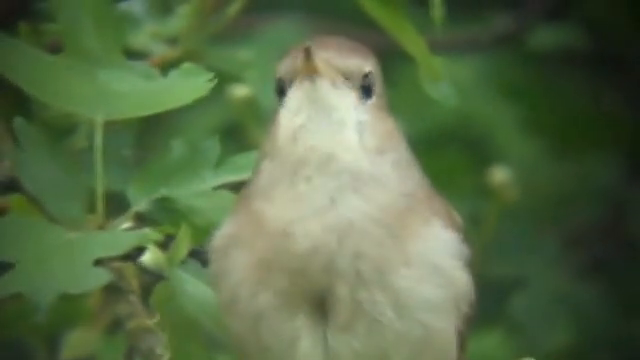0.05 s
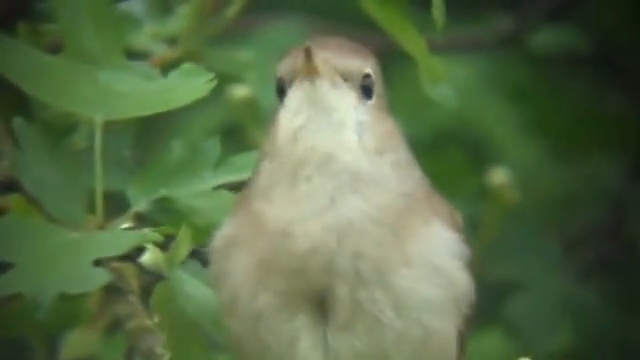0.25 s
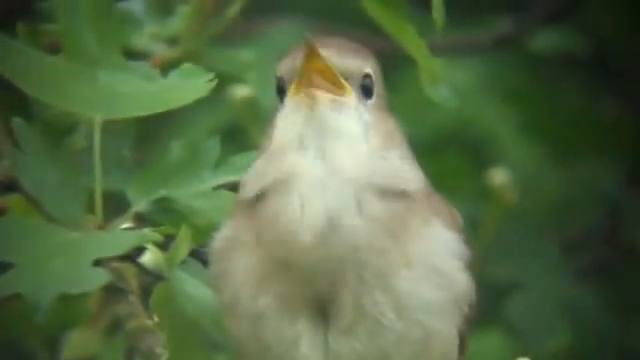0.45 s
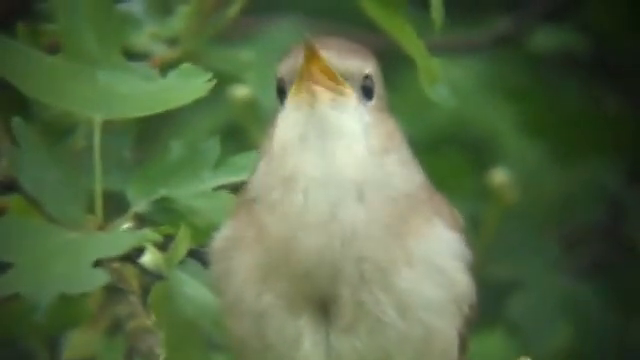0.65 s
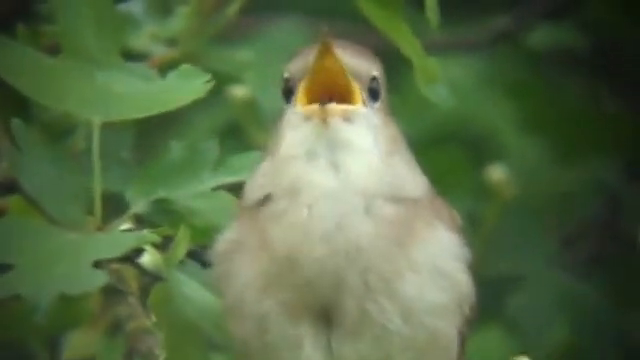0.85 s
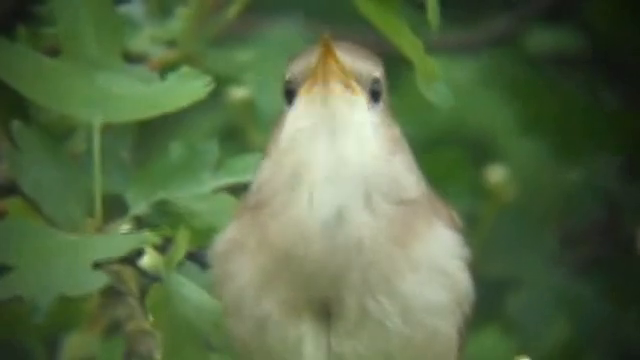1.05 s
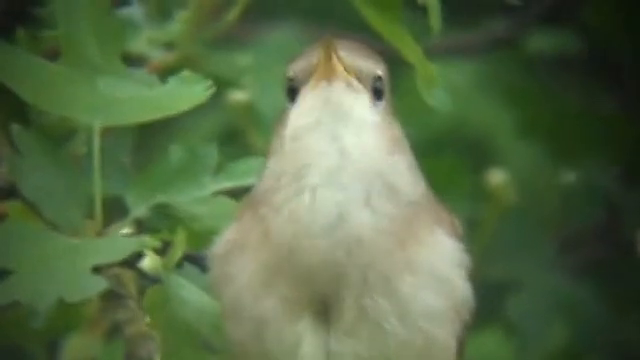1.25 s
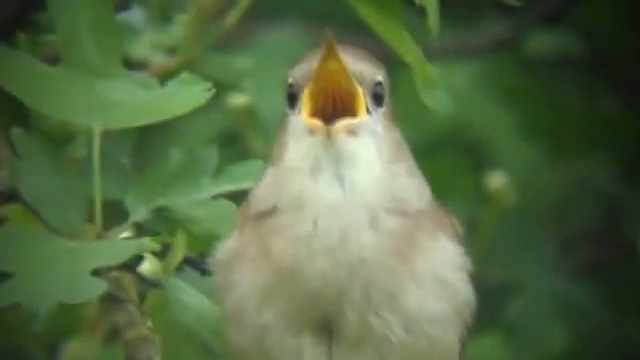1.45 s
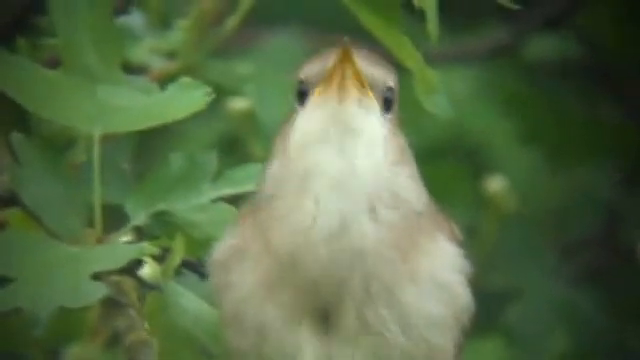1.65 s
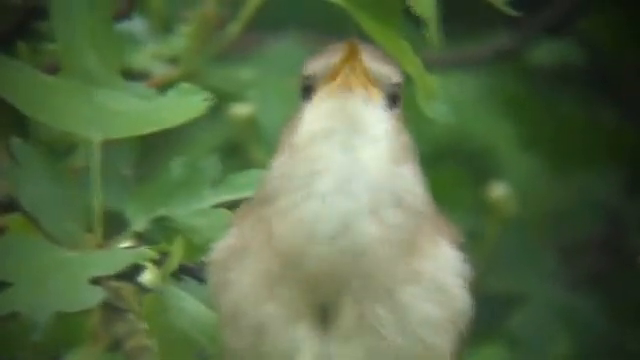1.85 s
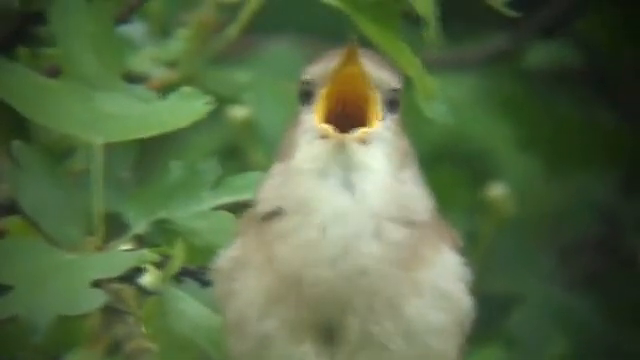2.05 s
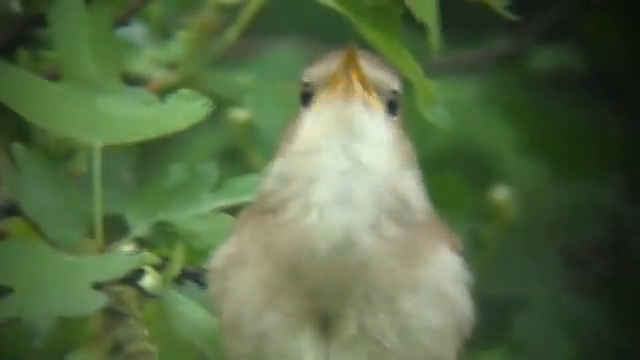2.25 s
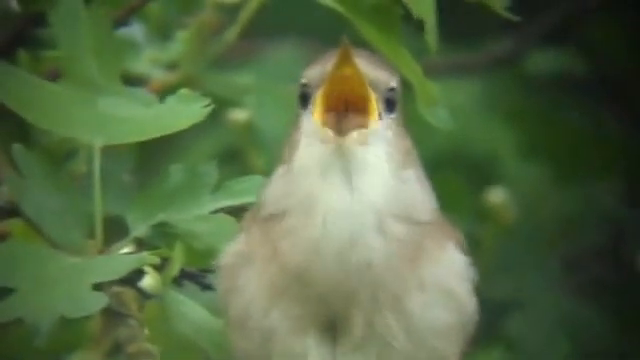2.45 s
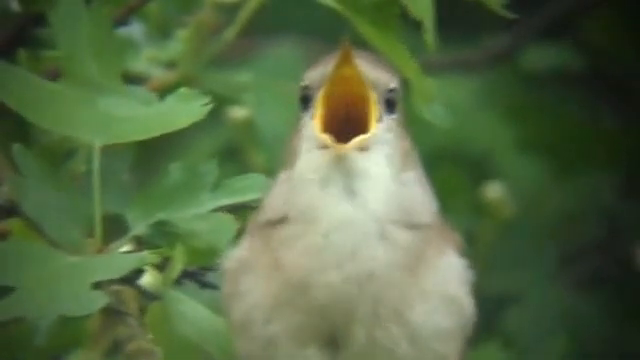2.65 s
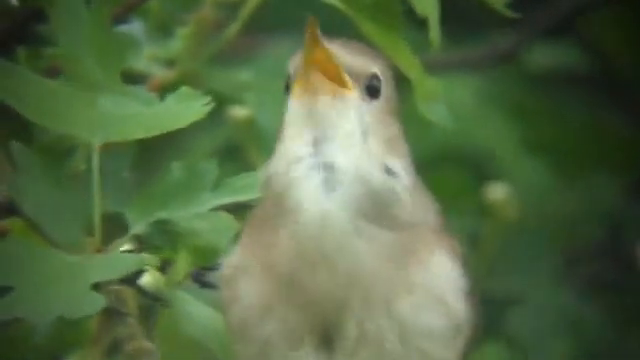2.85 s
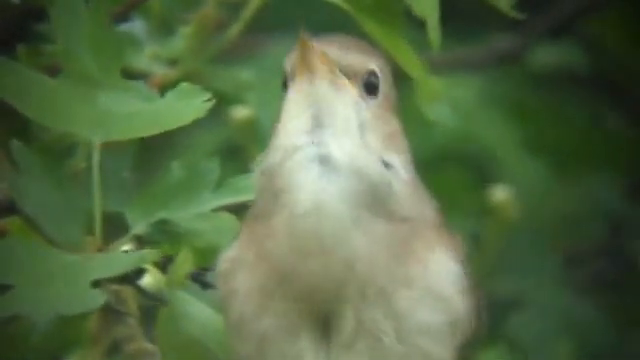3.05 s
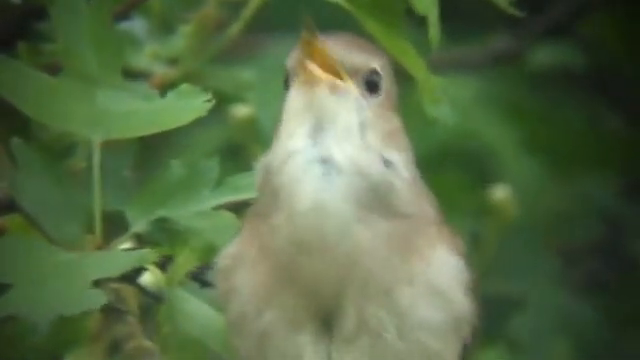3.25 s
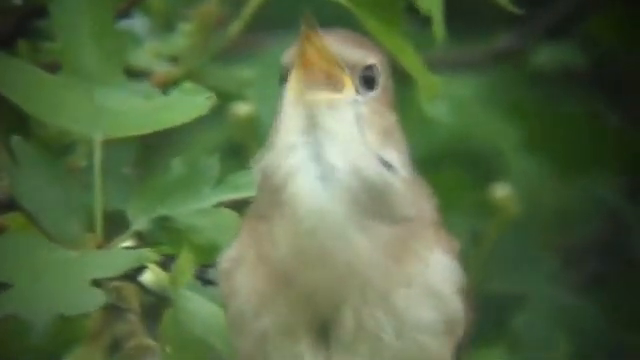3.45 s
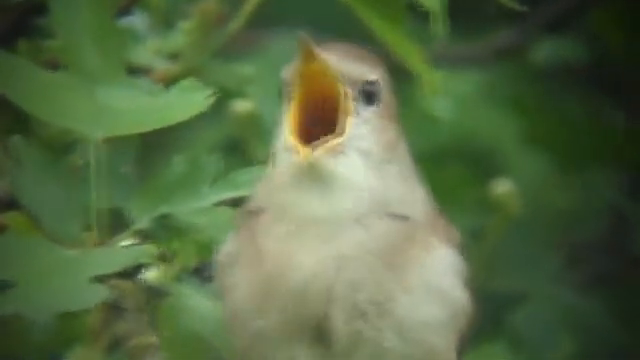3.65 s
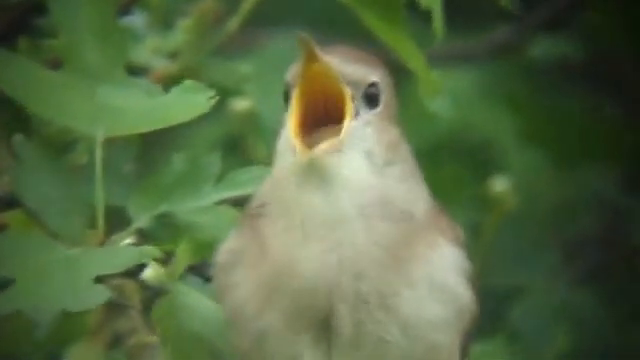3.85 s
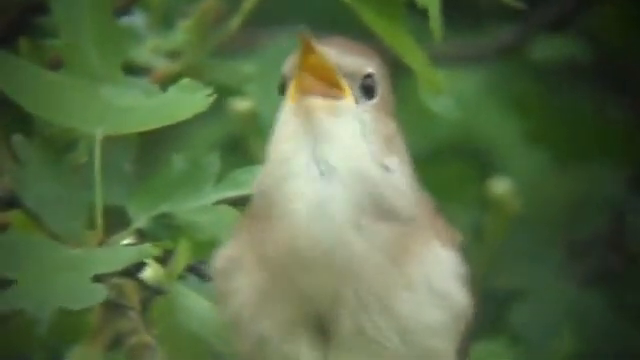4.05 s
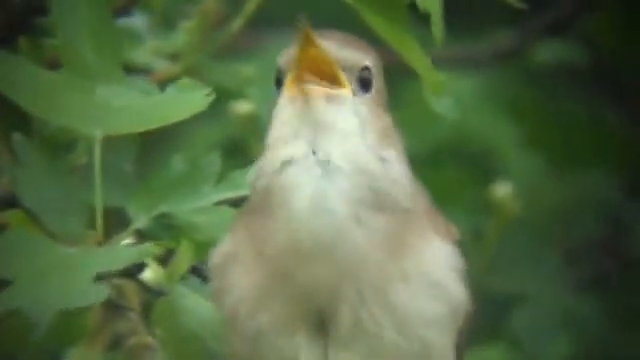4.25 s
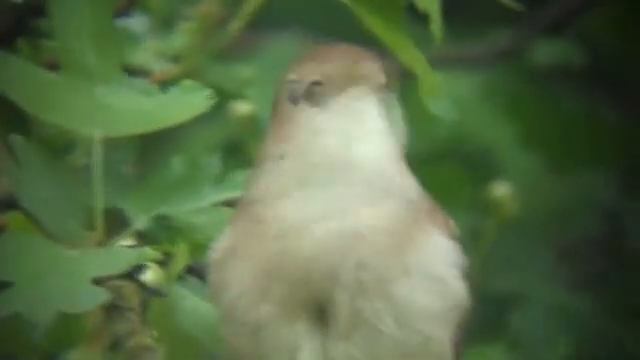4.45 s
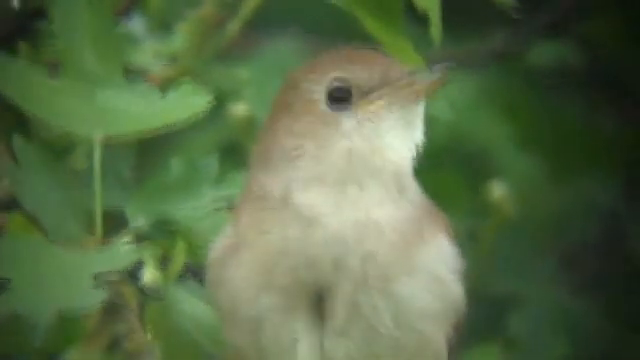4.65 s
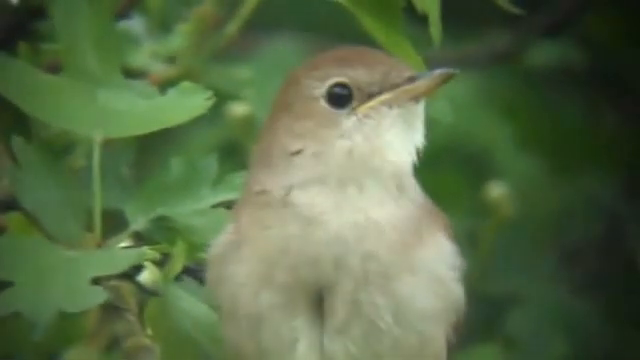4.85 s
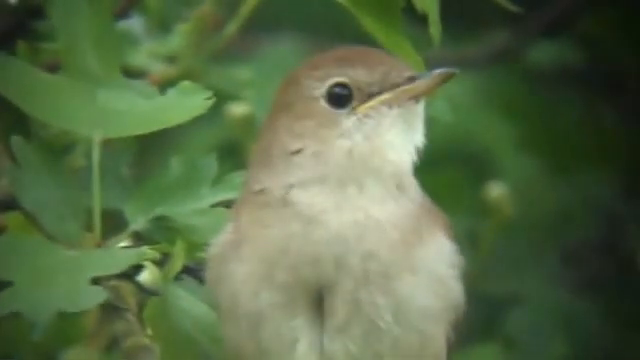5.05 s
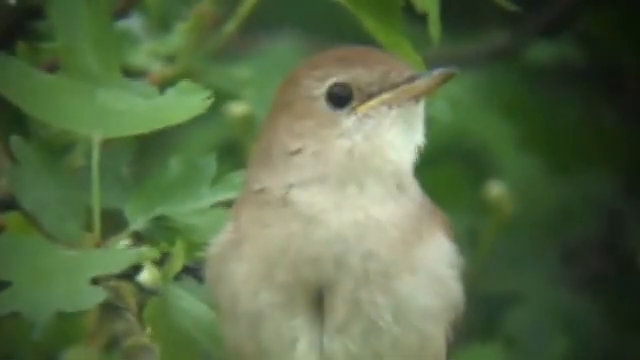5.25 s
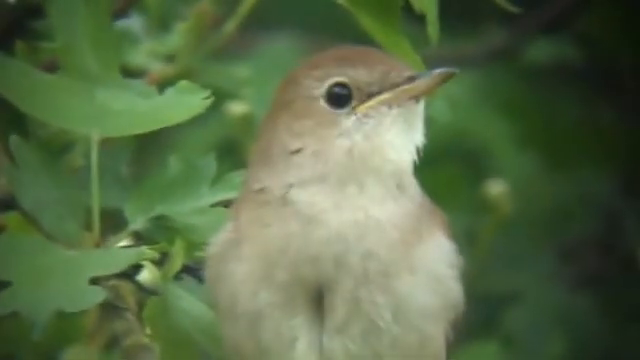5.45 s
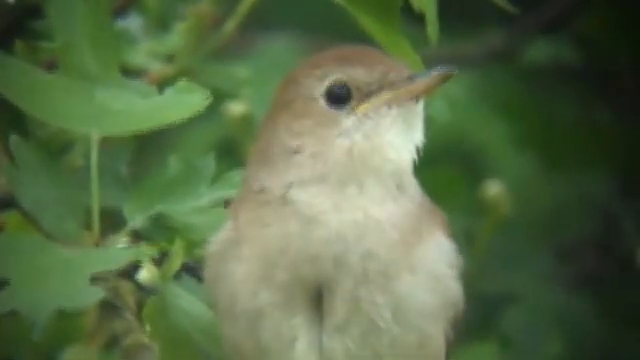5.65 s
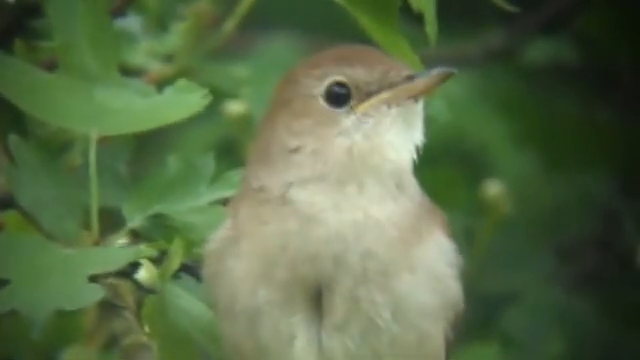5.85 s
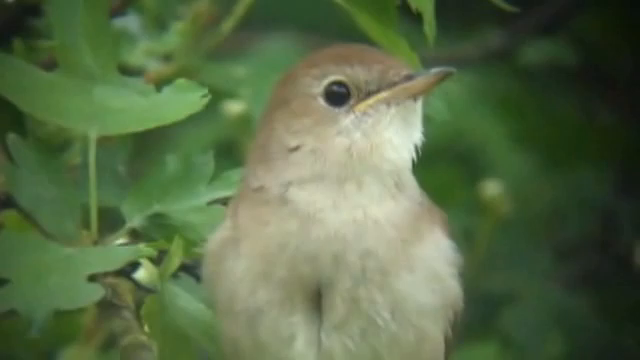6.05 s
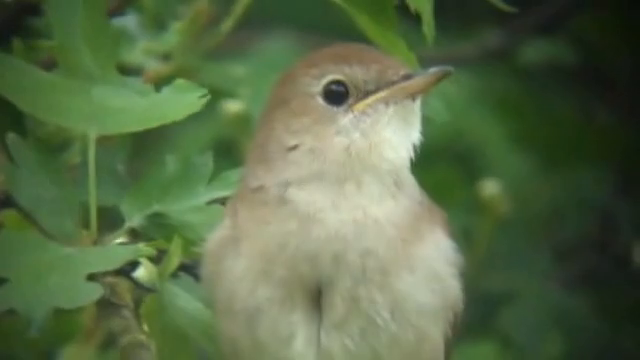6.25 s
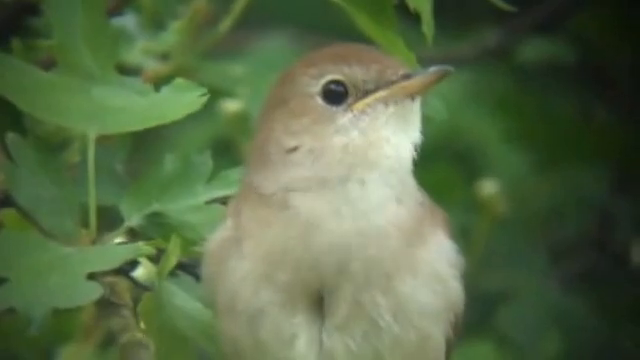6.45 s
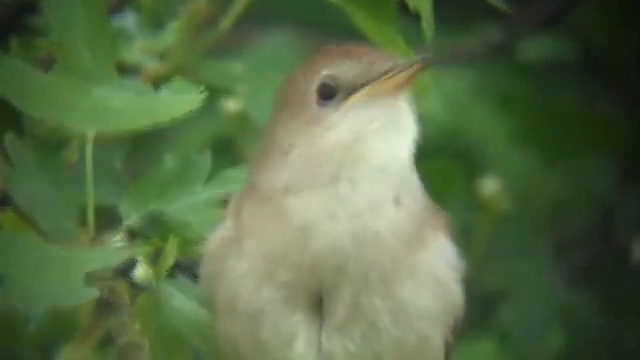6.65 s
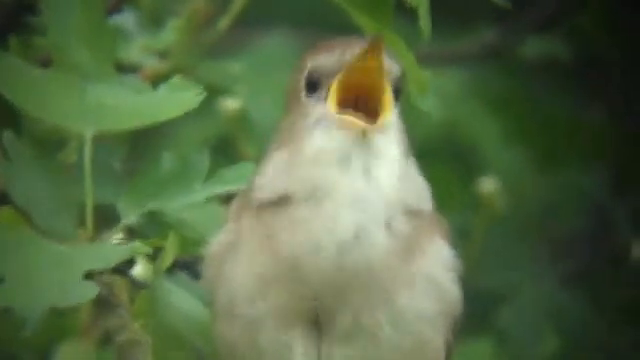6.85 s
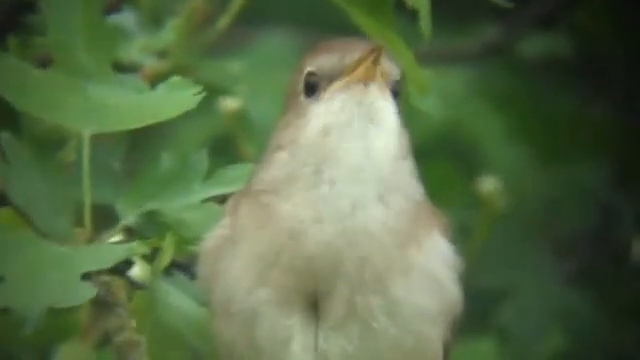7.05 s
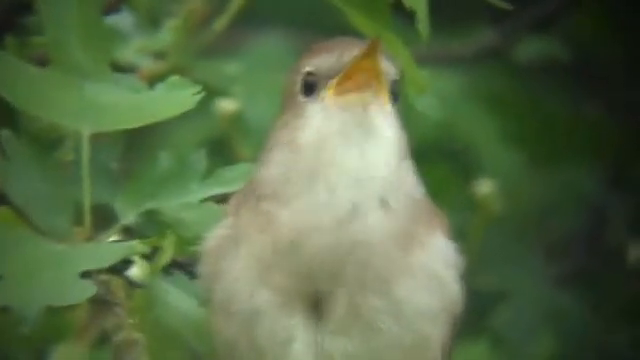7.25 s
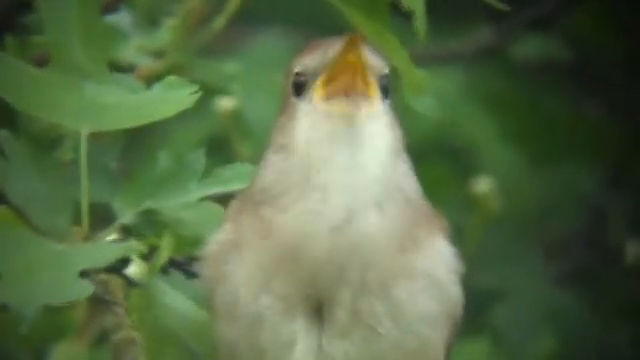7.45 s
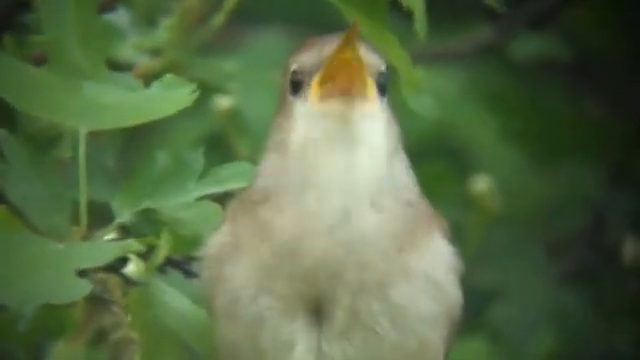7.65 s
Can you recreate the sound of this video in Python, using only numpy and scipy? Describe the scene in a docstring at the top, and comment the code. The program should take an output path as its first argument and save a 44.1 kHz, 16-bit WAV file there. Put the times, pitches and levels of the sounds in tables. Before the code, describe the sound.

Close nightingale song outdoors: whistles, pulsing buzzes, a chugging rattle, bright chips and a dry snap, a pause, then a new phrase.

```python
"""A nightingale sings close by from a hedge: two thin whistles and two buzzes parted by upward flicks, a rattling
run of low notes, two-voiced chips, falling notes and a snap; then a new phrase. Gliding tones with overtones form
most notes, pulsed tones the buzzes, a harmonic stack the mew, noise bursts the snaps. Birds further off are
bending pure tones and pulsed warbles. Branches echo, foliage answers as decaying noise, and shaped stereo noise
makes faint wind rumble and a distant hush."""
import sys
import numpy as np
from scipy import signal
from scipy.fft import rfft, irfft, next_fast_len
from scipy.io import wavfile
from scipy.ndimage import uniform_filter1d, map_coordinates

SR = 44100
rng = np.random.default_rng(int(sys.argv[2]) if len(sys.argv) > 2 else 0)


def int16_out(signal):
    """Quantize to a 16-bit WAV file."""
    q = np.round(np.clip(np.atleast_2d(signal).T, -1, 1) * 32767)
    wavfile.write(sys.argv[1], SR, q.astype(np.int16))


N = 340452
TOP_HZ = 15700


def amp(db):
    """Decibels to gain."""
    return 10 ** (np.asarray(db) / 20)


def unit(x):
    """Scaled to rms 1."""
    return x / np.sqrt(np.mean(x ** 2) + 1e-20)


def along(points, hz):
    """(hz, value) points read on a log frequency axis."""
    f, v = np.transpose(points)
    return np.interp(np.log(np.abs(hz) + 1), np.log(f + 1), v)


def curves(rows):
    """One smoothed curve per column, from the first row's time to the last."""
    s, *columns = np.transpose(rows)
    t = np.arange(s[0], max(s[-1], s[0] + .005), 1 / SR)
    return [uniform_filter1d(np.interp(t, s, c), size=80, mode="nearest") for c in columns]


def wobble(n, rate_hz):
    """A smooth random curve, rate_hz knots a second."""
    knots = rng.standard_normal(int(n * rate_hz / SR) + 4)
    return map_coordinates(knots, [np.arange(n) * rate_hz / SR])


def filtered(x, response):
    """x times a response of frequency."""
    n = x.shape[-1]
    m = next_fast_len(n + 8192)
    return irfft(rfft(x, m) * response(np.fft.rfftfreq(m, 1 / SR)), m)[..., :n]


def add(track, start_s, sound):
    """Mix a sound into a track at start_s."""
    start = max(round(start_s * SR), 0)
    track[start:start + len(sound)] += sound[:max(len(track) - start, 0)]


def soft_ends(n):
    """A gate that opens and closes within about a millisecond."""
    return signal.windows.tukey(n, min(120 / n, 1))


# Left-right likeness of the background: hz, correlation
LIKENESS = [(60, .72), (250, .55), (1000, .72)]


def rush(spectrum, patchy_db):
    """Stereo noise of rms 1 with patches of random gain."""
    z = signal.stft(rng.standard_normal((2, N)), nperseg=512)[2]
    field = uniform_filter1d(rng.standard_normal(z.shape[1:]), size=5, axis=0)
    field = uniform_filter1d(field, size=16, axis=1)
    pair = signal.istft(z * amp(patchy_db * unit(field)), nperseg=512)[1][:, :N]

    def mid_side_response(hz):
        """The less alike the ears are, the more goes to the side."""
        angle = np.arccos(np.clip(along(LIKENESS, hz), -1, 1)) / 2
        return amp(along(spectrum, hz)) * [np.cos(angle), np.sin(angle)]

    mid, side = filtered(pair, mid_side_response)
    return unit(np.array([mid + side, mid - side]))


GUST_RISE_DB_PER_S, GUST_SAG_DB_PER_S = 140, 7.5
GUST_FALL_DB_PER_S = 76  # added to the sag once the gust's length is over


def gust(t, length_s, level_db):
    """Gain of one gust, t seconds after its arrival: it builds, sags and drops."""
    rise_db = GUST_RISE_DB_PER_S * np.minimum(t, 0)
    sag_db = GUST_SAG_DB_PER_S * np.maximum(t, 0)
    fall_db = GUST_FALL_DB_PER_S * np.maximum(t - length_s, 0)
    return amp(level_db + rise_db - sag_db - fall_db)


# Gusts: arrival_s, length_s, level_db
GUSTS = [(0, .3, -23.5), (0.588, .95, -24), (1.693, 2.3, -44), (2.228, 0.15, -35.5), (3.058, 0.14, -35.5)]
# Wind spectrum: hz, relative_db_per_hz
RUMBLE = [(20, -18.5), (70, 0.5), (130, -1), (220, -3.5), (420, -16), (1000, -40), (2000, -87)]
CALM_DB = -51.5


def wind():
    """Low rumbling noise in gusts over a calm floor; powers add."""
    t = np.arange(N) / SR
    power = amp(CALM_DB) ** 2 + sum(gust(t - s, length_s, db) ** 2 for s, length_s, db in GUSTS)
    return np.sqrt(power) * amp(1.2 * wobble(N, 16)) * rush(RUMBLE, patchy_db=1.0)


# Hush level: time_s, level_db
HUSH_LEVEL = [(0, -40.5), (1.8, -37.5), (4.1, -38.5), (6.2, -42)]
# Hush spectrum: hz, relative_db_per_hz
HUSH = [(15, -24), (40, -3.5), (300, -1.5), (650, 1.5), (1080, -2.5), (2400, -17), (4500, -11.5),
        (5900, -14), (7500, -25.5), (13200, -26.5), (14500, -65)]


def hush():
    """The distant hush of the outdoors, slowly varying in level."""
    level_db = np.interp(np.arange(N) / SR, *np.transpose(HUSH_LEVEL))
    return amp(level_db) * rush(HUSH, patchy_db=1.46)


def glide(pitches_hz, n):
    """A smooth pitch curve through evenly spaced pitches."""
    steps = np.linspace(-1, 1, len(pitches_hz))
    polynomial = np.polyfit(steps, pitches_hz, len(pitches_hz) - 1)
    return np.polyval(polynomial, np.linspace(-1, 1, n))


FAR_FADE_DB = 6.5


def arch(length_s, pitches_hz, level_db):
    """Pitch and level of a far note: it bends through its pitches and is weaker at both ends."""
    u = np.linspace(-1, 1, int(length_s * SR))
    hz = glide(pitches_hz, len(u)) * (1 + .011 * wobble(len(u), 70))
    return hz, level_db - FAR_FADE_DB * u ** 4


def far_note(length_s, pitches_hz, level_db):
    """A pure tone that arches through its pitches."""
    hz, db = arch(length_s, pitches_hz, level_db)
    tone = np.sin(2 * np.pi * np.cumsum(hz) / SR)
    return np.sqrt(2) * amp(db) * soft_ends(len(hz)) * tone


TWITTER_COUNT, TWITTER_HZ, TWITTER_S = 50, 4200, .07  # typical pitch and length
TWITTER_DB = -54  # ahead of the trees


def twitter():
    """Faint notes of birds deep in the wood: short bending tones at random times."""
    chorus = np.zeros(N)
    for when, size, height, *bend in rng.uniform(-1, 1, (TWITTER_COUNT, 6)):
        pitches_hz = TWITTER_HZ * np.exp(.4 * height + .08 * np.array(bend))
        note = far_note(TWITTER_S * np.exp(size / 2), pitches_hz, TWITTER_DB)
        add(chorus, (when + 1) / 2 * N / SR, note)
    return chorus


# Small far birds: first_start_s, last_start_s, count, length_s, first_hz, middle_hz, last_hz, level_db
FAR_CALLS = [ (.092, .792, 5, .063, 7500, 6000, 4200, -42), (.32, .32, 1, .1, 3400, 3350, 3330, -37),
             (.516, 1.092, 4, .053, 5450, 5900, 6200, -43), (.98, 1.175, 2, .055, 6700, 5500, 4100, -40),
             (1.42, 1.42, 1, .14, 6800, 6850, 6900, -43), (1.63, 2.127, 3, .038, 5800, 5200, 4200, -39),
             (2.484, 2.65, 3, .034, 5800, 5100, 4200, -44), (2.628, 2.675, 3, .019, 1830, 2070, 1880, -38),
             (3.46, 5.66, 2, .08, 5900, 5750, 5900, -43), (4.558, 5.43, 11, .037, 5850, 4850, 3850, -36.5),
             (5.505, 5.92, 2, .07, 7700, 7600, 7300, -48), (5.79, 5.79, 1, .097, 4000, 3300, 5000, -43),
             (6.24, 6.54, 2, .19, 3650, 3520, 3420, -51), (6.635, 7.615, 2, .085, 6950, 6850, 6800, -42),
             (6.648, 6.648, 1, .02, 2900, 2100, 1500, -42), (6.765, 6.765, 1, .075, 4700, 4540, 4350, -39),
             (7.135, 7.298, 2, .045, 6800, 5300, 4050, -40), (7.325, 7.67, 3, .045, 3600, 4200, 5100, -39)]


def far_calls():
    """Bending tones repeated at even intervals."""
    chorus = np.zeros(N)
    for first_s, last_s, count, length_s, *pitches_hz, db in FAR_CALLS:
        for start_s in np.linspace(first_s, last_s, count):
            add(chorus, start_s, far_note(length_s, pitches_hz, db))
    return chorus


# A larger far bird: start_s, length_s, first_hz, middle_hz, last_hz, level_db
FLUTING = [(1.815, .05, 1950, 2050, 2020, -41), (1.9, .075, 1950, 2020, 1970, -40),
           (2.06, .06, 2150, 2120, 2050, -38), (2.18, .055, 2330, 2470, 2400, -35),
           (2.27, .09, 2550, 2300, 2380, -34), (2.345, .115, 2350, 2480, 1800, -33),
           (2.55, .06, 1950, 2020, 1970, -41), (7.025, .068, 2330, 2470, 2380, -36),
           (7.11, .032, 2330, 2300, 2050, -38), (7.235, .04, 1920, 1900, 1680, -42),
           (7.28, .088, 1980, 1790, 1730, -41), (7.592, .078, 1790, 1760, 1690, -32),
           (7.595, .14, 1980, 2070, 2030, -34)]


def fluting():
    """Low bending pure tones."""
    chorus = np.zeros(N)
    for start_s, length_s, *pitches_hz, db in FLUTING:
        add(chorus, start_s, far_note(length_s, pitches_hz, db))
    return chorus


def ticking(level_db=-47):
    """One far bird's dry ticking: very short falling tones in a quick even row."""
    chorus = np.zeros(N)
    for start_s in np.arange(6, 6.9, .025):
        pitches_hz = np.array([6500, 5000, 4000]) * rng.lognormal(0, 0.13)
        add(chorus, start_s, far_note(0.0068, pitches_hz, rng.normal(level_db, 2.3)))
    return chorus


# Overtone levels before push: hz, level_below_note_db
OVERTONES = [(3500, -14), (6000, -13.5), (8000, -29), (10000, -19.5), (11600, -9), (13300, -7.5),
             (14800, -20)]


def syrinx(hz, db, overtone_db, rasp_rad, even_db=0, waver=0.0066, flutter_db=1.66):
    """An unsteady tone; overtones grow where it is loudest, rasp blurs them, even_db offsets even ones."""
    n = len(hz)
    phase = 2 * np.pi * np.cumsum(hz * (1 + waver * wobble(n, 249))) / SR
    push = amp(overtone_db + .5 * (db - db.max()))
    overtones = np.zeros(n)
    for k in range(2, 8):
        gain = amp(along(OVERTONES, k * hz) + even_db * (k % 2 == 0)) * (k * hz < TOP_HZ)
        overtones += gain * np.sin(k * phase + rasp_rad * wobble(n, 2000))
    level = np.sqrt(2) * amp(db + flutter_db * wobble(n, 83.0)) * soft_ends(n)
    return level * (np.sin(phase) + push * overtones)


def buzz(hz, db, rate_hz, swing, dip_db, overtone_db, unevenness=0.04):
    """A tone chopped into quick uneven pulses, each sliding down in pitch."""
    n = len(hz)
    cycle = 2 * np.pi * np.cumsum(rate_hz * (1 + unevenness * wobble(n, 62.7))) / SR
    gap = ((1 + np.cos(cycle)) / 2) ** 3
    depth_db = dip_db * np.exp(0.35 * wobble(n, 35))
    pulsed_hz = hz * (1 + swing * np.sin(cycle))
    pulsed_db = db + 2 - depth_db * gap
    return syrinx(pulsed_hz, pulsed_db, overtone_db, rasp_rad=0.15, even_db=-8.5, waver=.011, flutter_db=.8)


# Warbles: start_s, length_s, first_hz, middle_hz, last_hz, level_db, first_swings_per_s, last_swings_per_s
FAR_WARBLES = [(0, .175, 4150, 3450, 2150, -36, 230, 170), (.245, .058, 2500, 3400, 4500, -34.5, 240, 170),
               (7.405, .15, 2550, 2120, 2100, -39, 75, 55)]


def far_warbles():
    """Arching tones whose pitch and level swing rapidly."""
    chorus = np.zeros(N)
    for start_s, length_s, *pitches_hz, level_db, first_rate, last_rate in FAR_WARBLES:
        hz, db = arch(length_s, pitches_hz, level_db)
        rate_hz = np.linspace(first_rate, last_rate, len(hz))
        add(chorus, start_s, buzz(hz, db, rate_hz, swing=0.13, dip_db=4.5, overtone_db=-42))
    return chorus


# Foliage decay: hz, t60_s
WOOD = [(4000, 0.42), (12000, 0.29)]


def trees(x):
    """Sound scattered by foliage: decaying noise tails, different at each ear."""
    hz, t, z = signal.stft(rng.standard_normal((2, SR)), SR, nperseg=256)
    decay = amp(-60 * t / along(WOOD, hz)[:, None])
    tail = signal.istft(z * decay, SR, nperseg=256)[1]
    tail /= np.linalg.norm(tail[0])
    delayed = np.pad(x, (400, 0))[None]
    mid, side = signal.fftconvolve(delayed, tail, axes=1)[:, :N]
    return mid + 0.75 * np.array([side, -side])


# Nearby branches: delay_s, level_db
ECHOES = [(.0042, -20), (.014, -18), (0.019, -17)]
# Stereo balance: hz, left_minus_right_db
PAN = [(3600, -3), (5000, 0.5)]


def branches(x):
    """The direct sound and a few early echoes, panned by frequency."""
    near = x.copy()
    for delay_s, db in ECHOES:
        add(near, delay_s, amp(db) * x)
    return filtered(near, lambda hz: amp(np.outer([.5, -.5], along(PAN, hz))))


# Dry noise burst: hz, relative_db_per_hz
SNAP_COLOUR = [(1500, -17), (2900, -10), (4500, 5), (6500, -2.5), (8500, -20), (12700, -2), (15500, -30)]


def snap(level_db, t60_s, hold_s=0.0097):
    """A harsh noise burst that starts at once, holds for a moment and dies quickly."""
    t = np.arange(SR // 8) / SR
    noise = rng.standard_normal(len(t))
    burst = unit(filtered(noise, lambda hz: amp(along(SNAP_COLOUR, hz))))
    return burst * amp(level_db - 60 * np.maximum(t - hold_s, 0) / t60_s) * soft_ends(len(t))


# Nasal note: time_s, pitch_hz, level_db
MEW = [(7.395, 1347, -35.5), (7.412, 1422, -27), (7.429, 1304, -27.5), (7.443, 1060, -31)]
# Throat resonance: hz, level_db
NASAL = [(1400, -13), (2800, -4), (4100, 7.5), (5600, -2.5), (8000, -24)]


def mew():
    """A low stack of harmonics, the third brought out by the throat."""
    hz, db = curves(MEW)
    phase = 2 * np.pi * np.cumsum(hz * (1 + .006 * wobble(len(hz), 400))) / SR
    stack = sum(amp(along(NASAL, k * hz)) * np.sin(k * phase) for k in range(1, 12))
    return amp(db) * soft_ends(len(hz)) * unit(stack)


BUZZ_HZ, BUZZ_HZ_PER_DB, BUZZ_RATE_HZ = 3770, 11, 152  # pitch at full effort, rise with effort, pulse rate
BUZZ_ATTACK_S, BUZZ_RELEASE_S, BUZZ_EDGE_DB = 0.031, 0.0094, 12
BUZZ_GAP_DB, BUZZ_GAP_PER_DB = 14, 1.1  # typical dip at full effort, deepening per dB below it


def crescendo(length_s, final_db, growth_db):
    """A growing buzz; with effort its pitch rises and its separate pulses run together."""
    t = np.arange(int(length_s * SR)) / SR
    attack = np.maximum(1 - t / BUZZ_ATTACK_S, 0)
    release = np.maximum(1 - (length_s - t) / BUZZ_RELEASE_S, 0)
    effort_db = growth_db * (t / length_s - 1)
    hz = BUZZ_HZ + BUZZ_HZ_PER_DB * effort_db
    db = final_db + effort_db - BUZZ_EDGE_DB * (attack + release)
    dip_db = BUZZ_GAP_DB + BUZZ_GAP_PER_DB * (final_db - db)
    return buzz(hz, db, BUZZ_RATE_HZ, swing=.036, dip_db=dip_db, overtone_db=-5)


# Syllables, before each note's level, pitch and length: name -> overtone_db, rasp_rad, strokes
# Strokes: delay_s, length_s, level_db, swell_s, swell_db, pitches_hz (mean, at even steps)
SYLLABLES = { "flick": (-24.5, .5, [(0, .02, -12, 0.016, 6, [2100, 2520, 2750]),
             (.003, .027, -13.5, 0.036, 8.5, [1740, 1860, 2250]),
             (.012, .021, -18, .012, 11, [3500, 3850, 4750]),
             (.027, 0.015, -1, 0.0094, 11.5, [2160, 2700, 2850, 3330])]),
             "chug": (-11.5, .7, [ (0, .019, -3, 0.016, 6, [1970, 1859, 2048, 2310]),
             (.014, .023, -2.5, 0.0076, 4.5, [2210, 2440, 1770, 1290])]),
             "chip": (0, 1.0, [(0, .016, -3.5, .006, 20, [2900, 4750, 5450]),
             (.007, .021, 0, .01, 18, [3500, 4480, 5120])]),
             "seer": (0, .6, [(0, .031, 0, .017, 22, [8600, 7550, 6550, 6300, 5250])]),
             "tew": (-12.5, .8, [(0, 0.023, -8.5, 0.018, 18, [1720, 1890, 2840]),
             (.028, .028, 0.5, 0.011, 4, [4040, 2946, 2590, 2490])]),
             "tsip": (-11, 0.32, [(0.00014, 0.039, -2.5, 0.023, 16, [2600, 4540, 3890, 3150, 3020])]), }
FADE_DB = 19.5  # fall from a stroke's peak to its end
SWELL_POWER = 1.96  # 1 sharp peak, 2 round
PITCH_SCATTER = .02  # random deviation, share of a stroke's pitch span


def syllable(name, level_db, pitch_ratio, stretch=1):
    """Each stroke glides in pitch, swells to its peak and fades; strokes may overlap."""
    overtone_db, rasp_rad, strokes = SYLLABLES[name]
    sound = np.zeros(SR // 8)
    for delay_s, length_s, db, swell_s, swell_db, pitches_hz in strokes:
        t = np.arange(int(length_s * stretch * SR)) / (SR * stretch)
        rising = np.maximum(1 - t / swell_s, 0)
        falling = np.maximum(t - swell_s, 0) / max(length_s - swell_s, 1 / SR)
        shape_db = -swell_db * rising ** SWELL_POWER - FADE_DB * falling ** SWELL_POWER
        scattered_hz = rng.normal(pitches_hz, PITCH_SCATTER * np.ptp(pitches_hz))
        hz = pitch_ratio * glide(scattered_hz, len(t))
        stroke = syrinx(hz, level_db + db + shape_db, overtone_db, rasp_rad, flutter_db=1.5)
        add(sound, delay_s * stretch, stroke)
    return sound


# Flicks, one before each long note: start_s
FLICK_TIMES = [0.739, 1.458, 2.033, 2.585]
FLICK_DB, FLICK_GROWTH_DB, FLICK_PITCH_RATIO = -23, 3, 1.02  # first level, gain of each next one
# Whistles: time_s, pitch_hz, level_db
WHISTLES = [
    [(0.935, 3770, -36.5), (1.125, 3695, -25.5), (1.161, 3786, -21.5), (1.221, 3880, -22),
     (1.291, 3810, -23.5), (1.32, 3430, -34)],
    [(1.635, 3700, -36), (1.662, 3620, -23.5), (1.737, 3797, -19), (1.797, 3800, -18.5), (1.827, 3928, -18),
     (1.887, 3810, -19.5), (1.9, 3670, -33)],
    [(7.098, 3150, -29.5), (7.13, 3215, -18), (7.151, 3317, -16.5), (7.168, 3228, -10), (7.18, 3167, -15),
     (7.187, 3260, -25)],
]
# Buzzes: start_s, length_s, final_level_db, crescendo_db
BUZZES = [(2.186, 0.294, -13, 8.5), (2.741, 0.238, -13.5, 3.5)]
# Quick notes: start_s, syllable, level_db, pitch_ratio, length_ratio
NOTES = [(2.615, "chip", -23.5, .8, 0.44), (3.073, "chug", -15, 0.96, 1.12),
         (3.15, "chug", -13, 1.015, .98), (3.235, "chug", -14.5, 0.96, .95),
         (3.317, "chug", -15, 0.98, 1.03), (3.402, "chug", -15.5, 0.96, 1),
         (3.488, "chug", -15, 0.97, 0.89), (3.574, "chug", -15, 0.95, 0.97),
         (3.576, "chip", -31, .93, 0.99), (3.654, "chug", -16, 0.97, 1.2),
         (3.738, "chug", -14.5, 1.015, 1.12), (3.834, "chip", -11.5, 1.034, 1.2),
         (3.866, "seer", -13.5, 0.96, 0.95), (3.939, "chip", -10, 1.056, 1.05),
         (3.969, "seer", -14.5, 0.98, 1.1), (4.051, "chip", -9, 1.055, 1.06),
         (4.08, "seer", -15.5, 1.02, 1.1), (4.16, "chip", -9.5, 1.07, 1.03),
         (4.19, "seer", -16, 1.04, 1.04), (4.284, "tew", -13.5, 0.98, 1.14),
         (4.397, "tew", -11, 0.98, 0.94), (4.503, "tew", -12, 0.98, 0.82), (6.993, "tsip", -13, 0.98, 0.99)]
# Snaps: start_s, level_db, t60_s
SNAPS = [(4.619, -18.5, 0.048), (7.528, -22.5, 0.043)]


def nightingale():
    """The near singer; the two sides of its syrinx can sound at once."""
    voice = np.zeros(N)
    for k, start_s in enumerate(FLICK_TIMES):
        add(voice, start_s, syllable("flick", FLICK_DB + k * FLICK_GROWTH_DB, FLICK_PITCH_RATIO))
    for rows in WHISTLES:
        hz, db = curves(rows)
        whistle = syrinx(hz, db, overtone_db=-14.0, rasp_rad=.06, even_db=-2, flutter_db=0.36)
        add(voice, rows[0][0], whistle)
    for start_s, length_s, final_db, growth_db in BUZZES:
        add(voice, start_s, crescendo(length_s, final_db, growth_db))
    for start_s, name, db, pitch_ratio, stretch in NOTES:
        add(voice, start_s, syllable(name, db, pitch_ratio, stretch))
    add(voice, MEW[0][0], mew())
    for start_s, db, t60_s in SNAPS:
        add(voice, start_s, snap(db, t60_s))
    return voice


def scene():
    """The near bird is almost dry, the far ones wetter, the twitter comes only through the trees."""
    background = wind() + hush()
    far = far_calls() + fluting() + far_warbles() + ticking()
    wood = trees(amp(-9.0) * far + twitter())
    near = nightingale()
    singer = branches(near) + amp(-14.8) * trees(near)
    return background + far + wood + singer


def record(dry):
    """Everything above TOP_HZ is removed."""
    return filtered(dry, lambda hz: hz < TOP_HZ)


dry = scene()
out = record(dry)
int16_out(out)
```